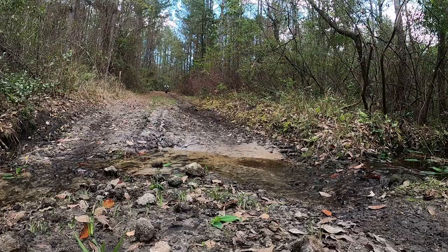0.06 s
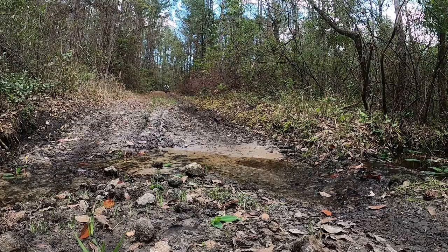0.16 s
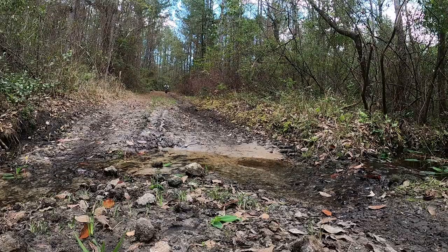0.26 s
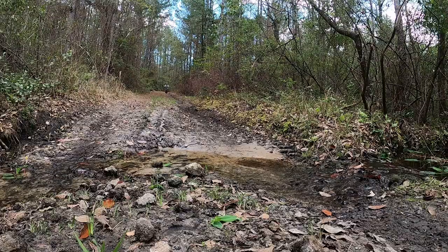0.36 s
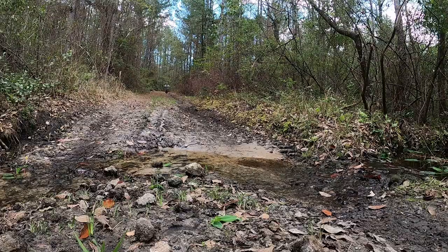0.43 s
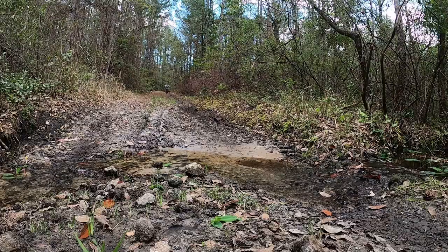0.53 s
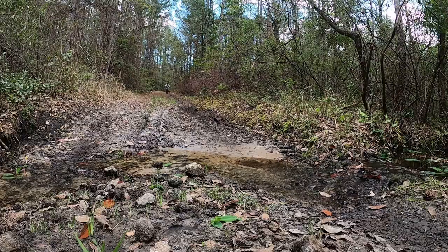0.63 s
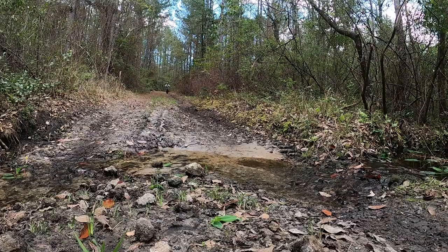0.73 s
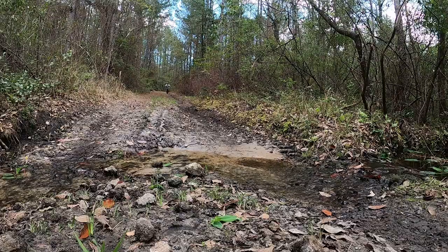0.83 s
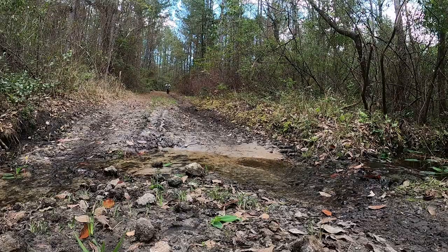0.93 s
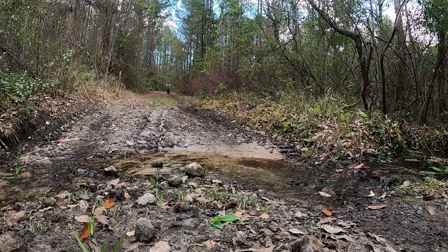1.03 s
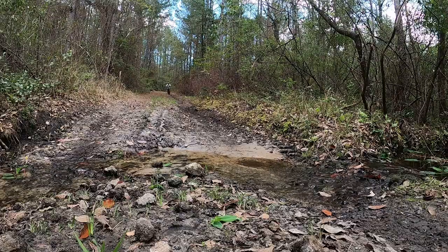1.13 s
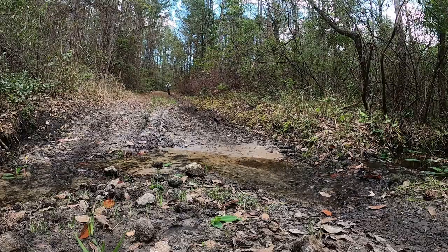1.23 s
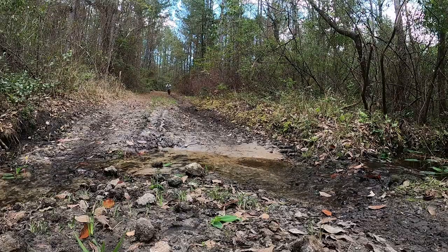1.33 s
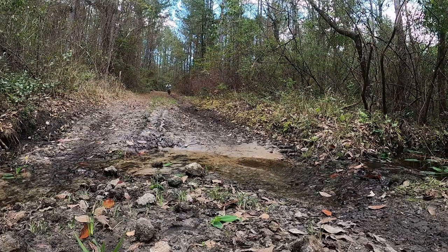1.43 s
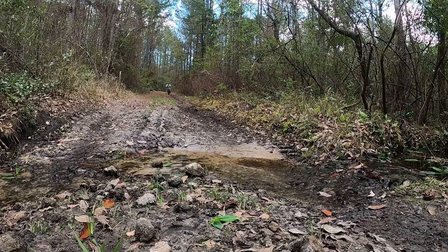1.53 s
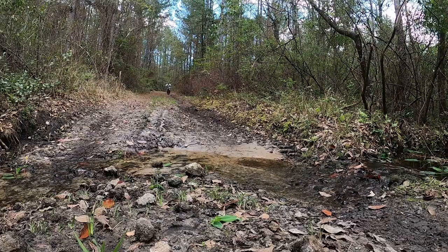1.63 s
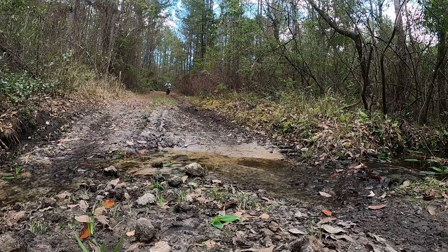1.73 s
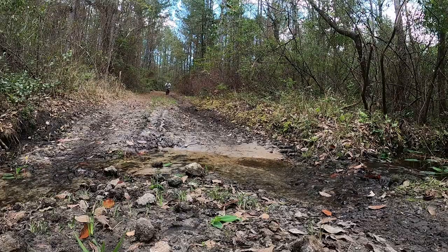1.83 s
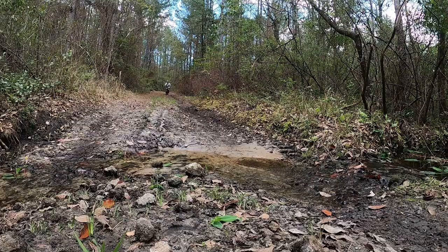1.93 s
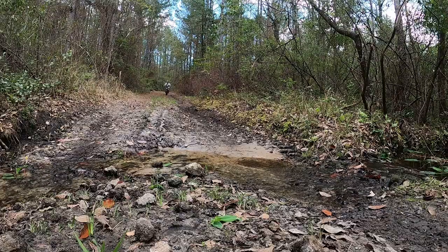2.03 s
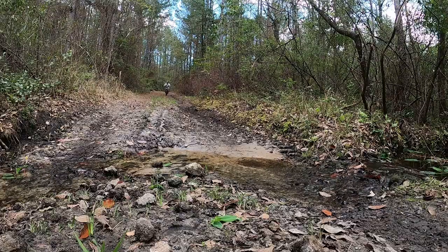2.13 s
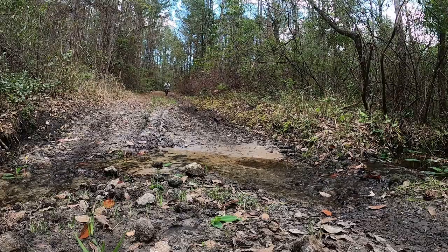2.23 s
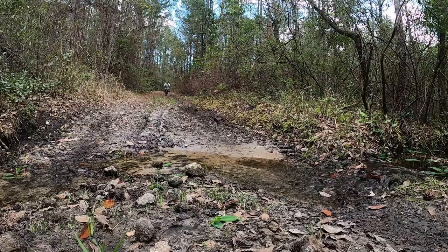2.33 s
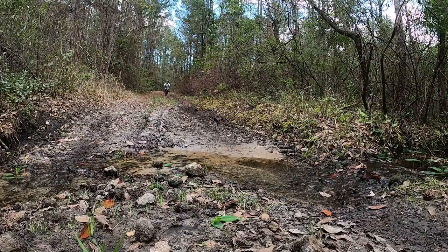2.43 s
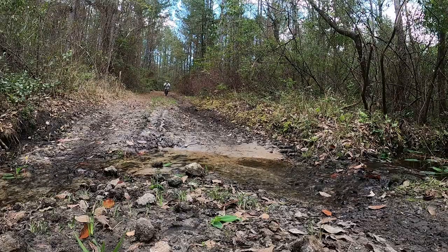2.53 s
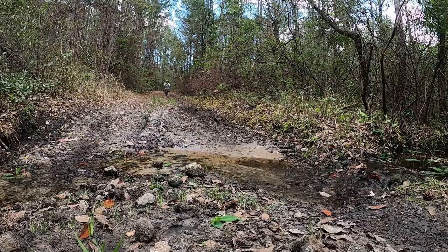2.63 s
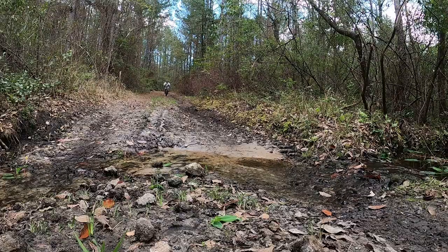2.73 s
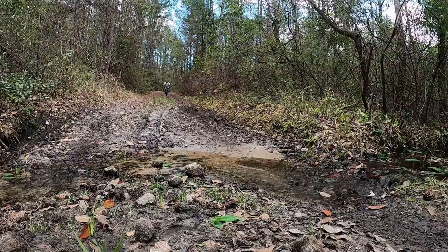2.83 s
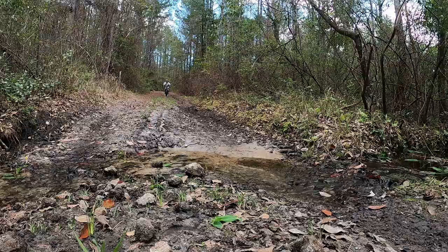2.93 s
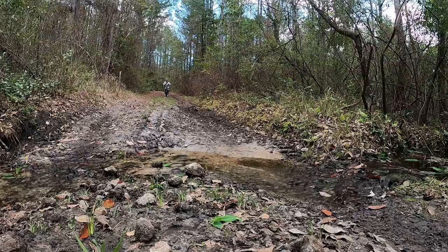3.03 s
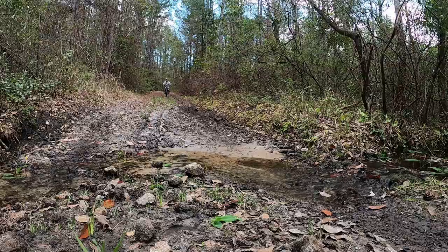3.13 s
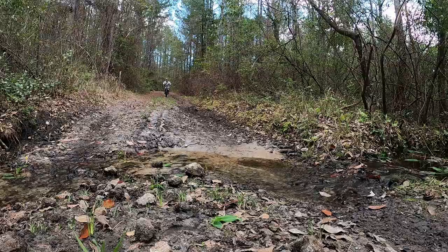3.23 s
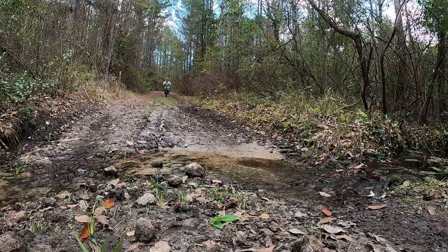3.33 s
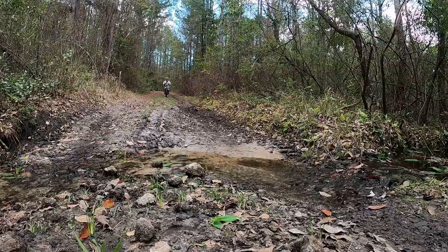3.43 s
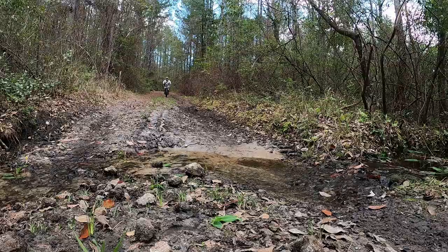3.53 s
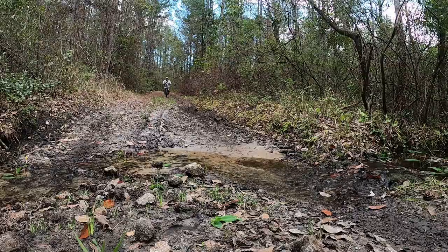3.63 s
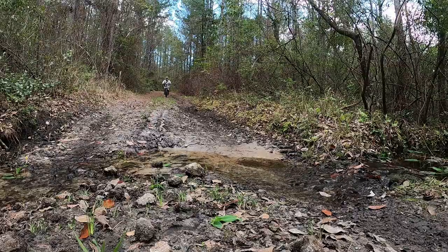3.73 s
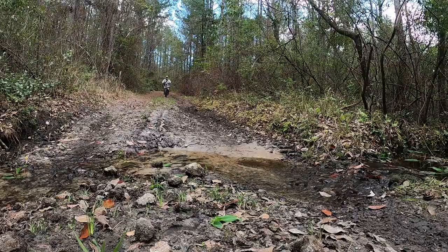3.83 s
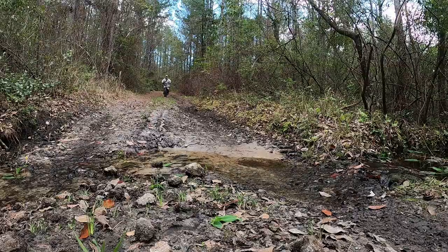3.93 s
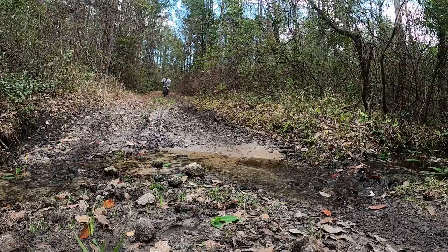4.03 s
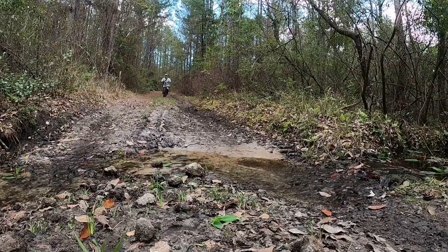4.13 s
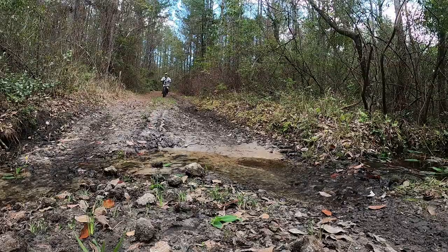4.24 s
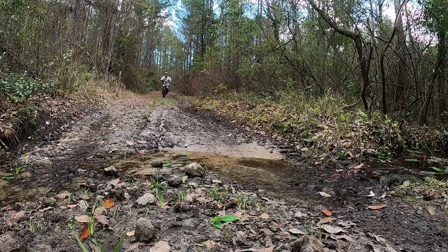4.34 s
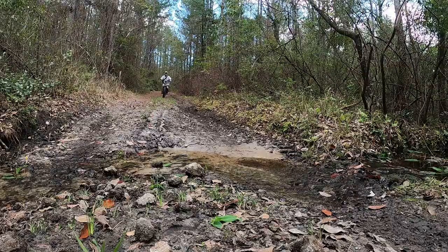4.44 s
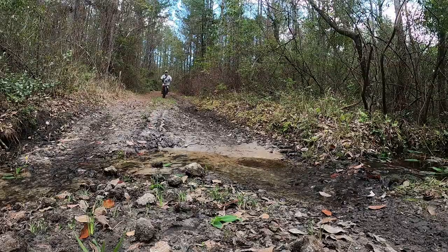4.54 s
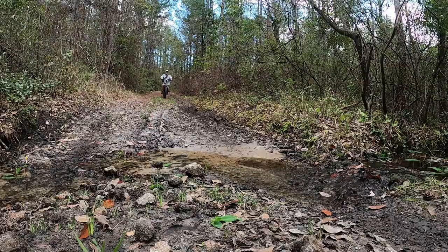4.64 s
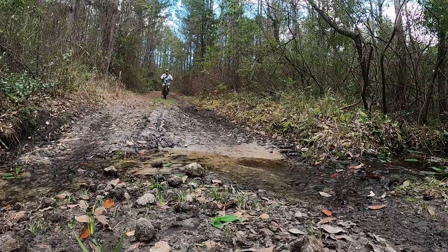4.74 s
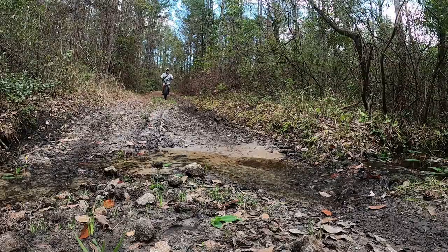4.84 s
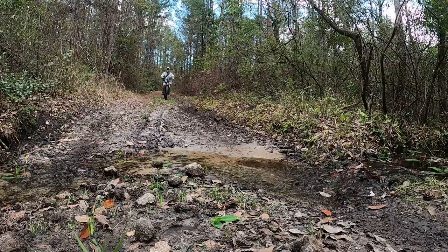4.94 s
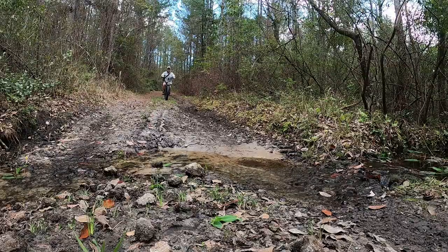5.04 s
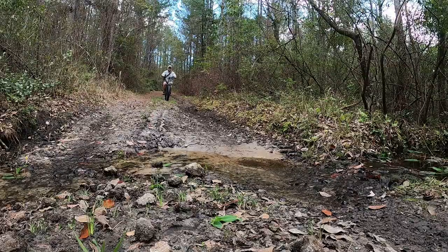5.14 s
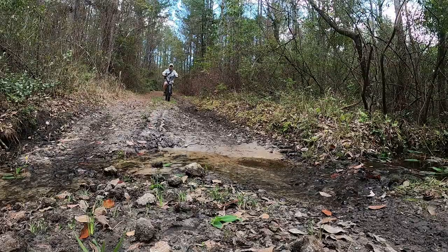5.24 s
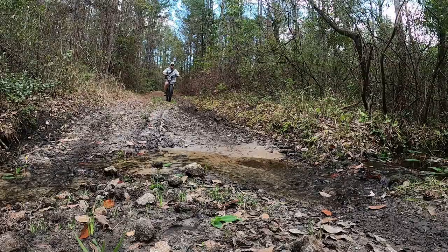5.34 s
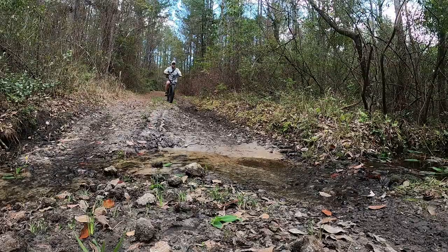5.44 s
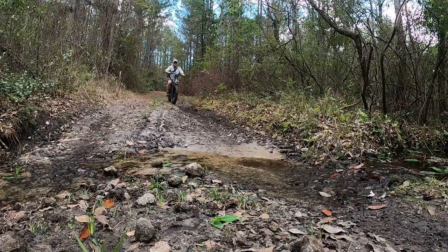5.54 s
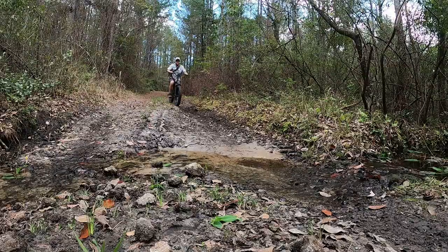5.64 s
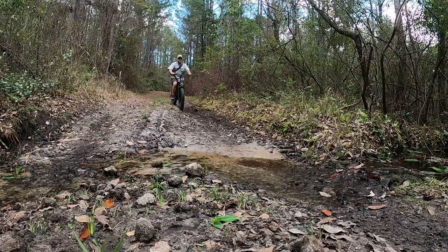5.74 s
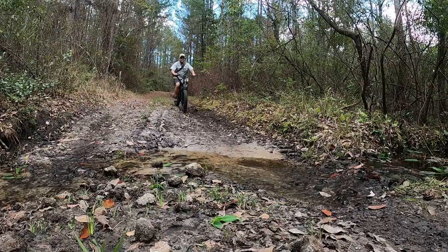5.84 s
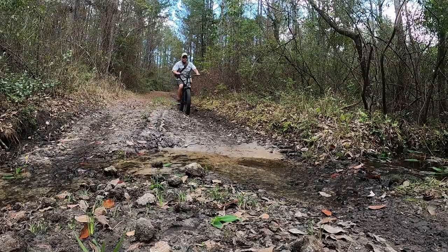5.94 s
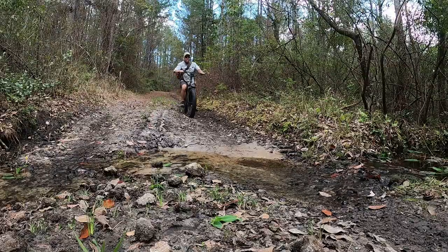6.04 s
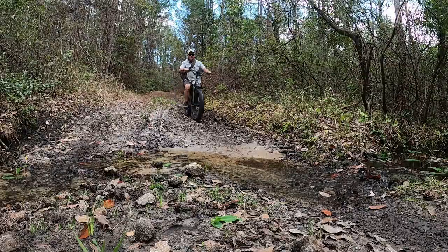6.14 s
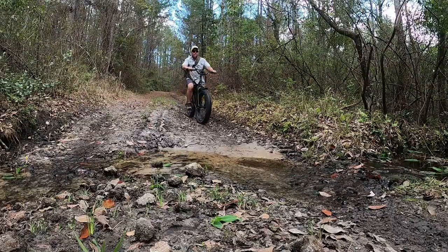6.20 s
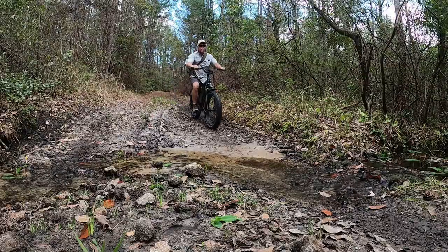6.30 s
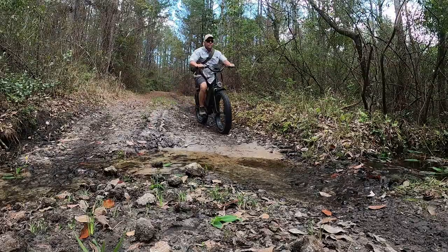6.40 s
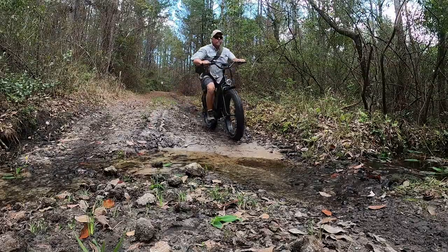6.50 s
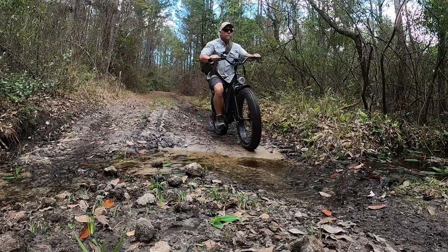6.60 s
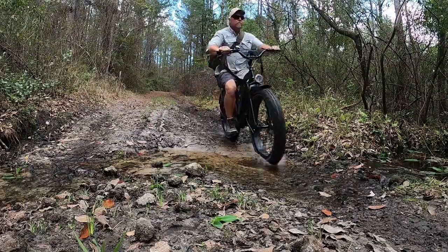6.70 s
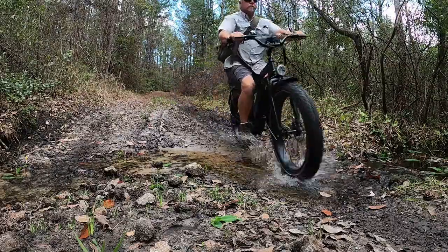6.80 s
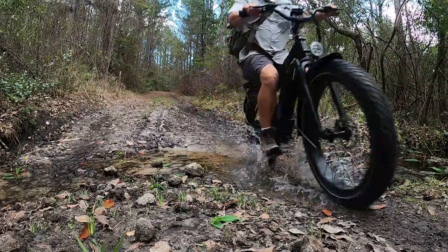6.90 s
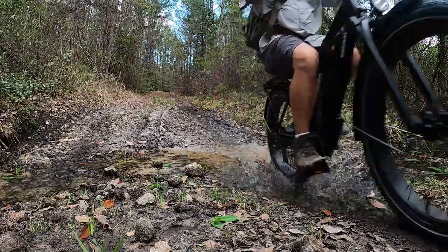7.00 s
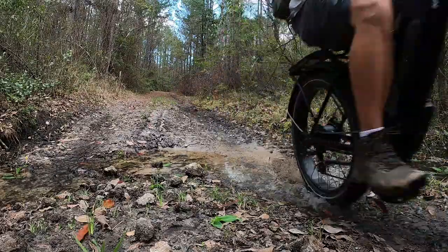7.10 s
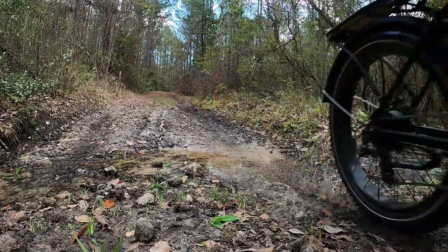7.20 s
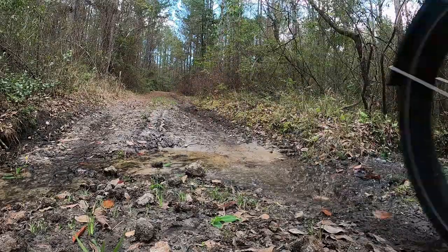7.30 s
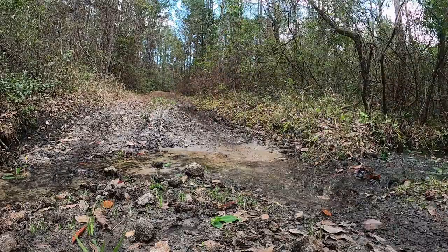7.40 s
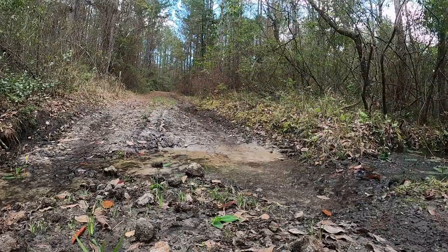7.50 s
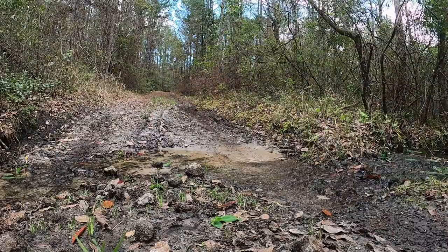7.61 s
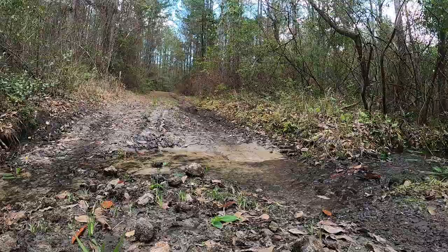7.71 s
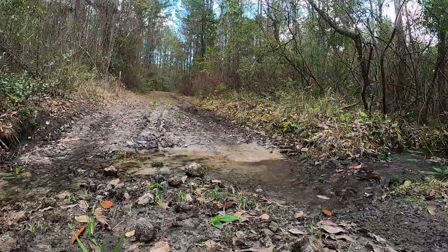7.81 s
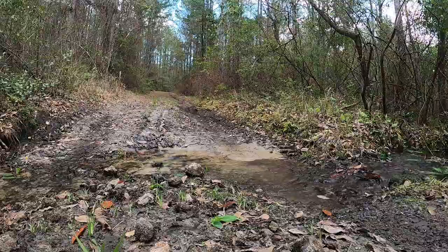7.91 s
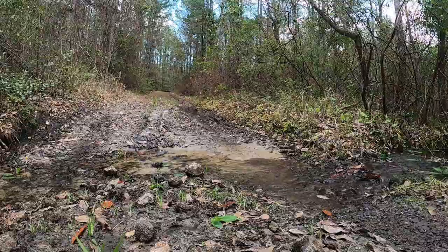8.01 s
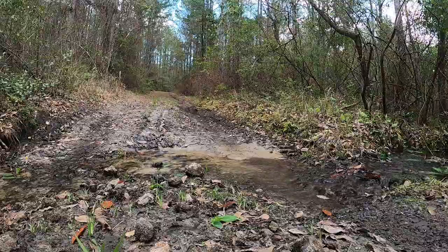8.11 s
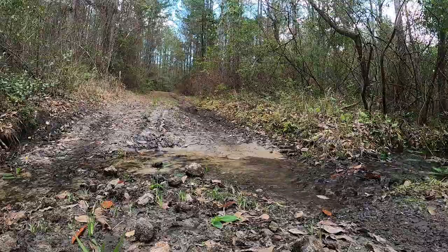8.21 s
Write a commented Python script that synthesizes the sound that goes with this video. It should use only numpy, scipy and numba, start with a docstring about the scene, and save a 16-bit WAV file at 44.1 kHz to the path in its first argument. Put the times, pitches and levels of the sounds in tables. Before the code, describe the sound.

Water trickles and bubbles on a forest trail as a fat-tire electric bike approaches, splashes through a muddy puddle and rolls past.

```python
"""A wet forest trail, heard from the ground. A fat-tyre electric bike comes up, ploughs through a shallow
puddle and rolls past: the tyres crunch grit, thud over stones, squelch in the mud and throw spray.
Close by, water trickles with bright ticks, its bubbles ringing as they pop. Behind it all the
far tyres drone and the woods hiss. Hits are damped sines; textures are clouds of them mixed with noise."""
import sys
import numpy as np
from scipy import signal
from scipy.fft import rfft, irfft, next_fast_len
from scipy.io import wavfile
from scipy.ndimage import uniform_filter1d
from numba import njit

SR = 44100
rng = np.random.default_rng(int(sys.argv[2]) if len(sys.argv) > 2 else 0)


def inscribe(sig):
    """Save sig as 16-bit PCM at rate SR to the path in sys.argv[1].

    A 1-D sig is mono; a 2-D sig holds one channel per row.
    Samples are clipped to [-1, 1] before scaling.
    """
    pcm = np.round(np.clip(np.atleast_2d(sig).T, -1, 1) * 32767)
    wavfile.write(sys.argv[1], SR, pcm.astype(np.int16))


N = 364266

# Near-tyre faders: (time [s], weight [dB], thrown water [dB], mud depth [dB], water fineness [dB])
TYRE_FADERS = [(5.1, -30, -57, 0, -12), (5.55, -69, -63.5, -9, -14), (5.62, -42.5, -67, -2, -2),
               (5.9, -61, -63, 8, -4), (5.92, -31.5, -57, 6, 5), (6.02, -43, -50, 6.5, -4),
               (6.16, -32, -47, 4, 3), (6.3, -28, -47, -2.5, 6), (6.39, -38.5, -46, 1, 16),
               (6.56, -33, -38, 3.5, 14), (6.82, -27, -32.5, -1, 14.5), (6.85, -25, -23, 2, 14.5),
               (6.95, -24, -20.5, 0.5, 8), (7.08, -22, -21, 1, 4.5), (7.27, -21.5, -22.5, 3, -5),
               (7.31, -30.5, -35, 3.5, -6), (7.42, -30.5, -31, -1.5, -2), (7.56, -29, -38, 4.5, 2),
               (7.82, -38, -44.5, 3.5, -18), (7.91, -41, -45, 3, -7), (8.05, -32, -49, 3, 3),
               (8.26, -46.5, -47.5, 6.5, -5)]
# Spurts and jolts: (time [s], level [dB], hold [s], brightness step from layer to layer [dB])
SPURTS = [(5.91, -42, 0.0084, 6), (5.938, -38.5, 0.026, -2.5), (5.983, -48, 0.009, 7.5),
          (6.146, -40, 0.018, -12.5), (6.251, -40, 0.037, -16), (6.317, -43, 0.0062, -14),
          (6.476, -31.5, 0.021, -2.5), (6.59, -32, 0.042, -1), (6.67, -27, 0.038, 0.5),
          (6.754, -34, 0.0089, 6.5), (6.833, -28.5, 0.047, 9.5), (6.978, -29, 0.0099, 1),
          (7.043, -22, 0.0064, 0.5), (7.079, -17.5, 0.032, -1), (7.192, -23, 0.028, -0.5),
          (7.259, -29, 0.0082, -5), (7.364, -35, 0.031, 2.5), (7.402, -44, 0.024, 5),
          (7.455, -30, 0.045, -7), (7.584, -38, 0.012, -8), (7.641, -35, 0.0095, 0),
          (7.688, -43.5, 0.016, 7.5), (7.77, -43.5, 0.061, 0), (7.84, -33.5, 0.011, -5),
          (7.96, -29, 0.033, -4), (8.036, -35, 0.044, -1.5), (8.11, -50, 0.0053, 8),
          (8.138, -33, 0.0069, -2)]
# Spurt trim per layer: (thud [dB], squelch [dB], splash [dB], spray [dB])
SPURT_TRIMS = [-8, -2, -3.5, -9]
# Grit fader: (time [s], level [dB])
GRIT_FADER = [(4.6, -66.5), (5.05, -61.5), (5.3, -58), (5.5, -60), (5.65, -50), (5.88, -49.5), (6.0, -45.5),
              (6.15, -38), (6.3, -48), (6.5, -51), (6.8, -62)]
# Bike pan: (time [s], left minus right [dB])
BIKE_PAN = [(5.3, 0.5), (6.22, 0.5), (6.5, 0), (7.31, -1.5), (7.62, 1.5), (7.81, 5.5), (8.26, 7)]
# Hits on stones (the first row a far thud up the trail), tyre booms, bubble pops, water ticks: (time [s], level
# [dB], pitch [Hz])
STONE_HITS = [(0.312, -37, 334), (5.911, -25.5, 5450), (5.912, -21, 924), (5.953, -21.5, 830),
              (6.065, -17, 1140), (6.175, -17.5, 463), (6.251, -17, 364), (6.256, -17.5, 885),
              (6.265, -19, 335), (6.278, -13.5, 342), (6.331, -22, 340), (6.333, -18.5, 1060),
              (6.482, -16, 3830), (6.517, -13.5, 1140), (6.523, -15.5, 374), (6.591, -23, 3660),
              (6.687, -7.5, 3340), (6.708, -14, 4030), (6.726, -17, 1100), (6.758, -18, 301),
              (6.834, -12, 3600), (6.998, -6.5, 1390), (7.045, -7, 1500), (7.107, -8, 316),
              (7.113, -8, 1090), (7.178, -11, 1280), (7.215, -9, 2510), (7.265, -17, 4230),
              (7.303, -14, 1310), (7.307, -7, 1500), (7.314, -15, 1100), (7.39, -18, 3500),
              (7.462, -13, 480), (7.49, -16, 3340), (7.493, -17, 344), (7.51, -22, 1200), (7.6, -18, 910),
              (7.635, -19, 3230), (7.771, -21, 960), (7.848, -22, 1100), (7.941, -17, 850),
              (7.964, -12, 960), (7.978, -8.5, 1070), (7.992, -17, 1030), (8.029, -12, 298),
              (8.045, -11.5, 347), (8.053, -9, 500), (8.067, -13.5, 430), (8.144, -18.5, 1010)]
TYRE_BOOMS = [(6.72, -26, 55), (7.08, -18, 109), (7.25, -19, 55), (8.111, -26.5, 62)]
BUBBLE_POPS = [(0.079, -40, 2660), (0.164, -33.5, 4930), (0.29, -43.5, 1100), (0.314, -45.5, 870),
               (0.423, -37, 5550), (0.464, -40.5, 3170), (0.558, -36, 5000), (0.656, -43, 2590),
               (0.669, -33, 1476), (0.705, -41, 1554), (0.724, -30.5, 3900), (0.733, -43, 1420),
               (0.753, -46, 1370), (0.817, -45, 4030), (0.833, -51, 2080), (0.942, -47, 720),
               (0.978, -45, 1890), (1.064, -36, 1436), (1.066, -40, 1880), (1.154, -37.5, 1970),
               (1.199, -35.5, 4220), (1.223, -37, 3360), (1.268, -37.5, 3040), (1.395, -46.5, 1310),
               (1.562, -43.5, 1440), (1.587, -40, 2840), (1.61, -31, 1965), (1.668, -40, 1750),
               (1.781, -40, 3080), (1.794, -44, 1380), (1.794, -40, 2460), (1.824, -38.5, 2750),
               (1.862, -40, 4290), (1.952, -44, 1310), (1.994, -40, 1330), (2.085, -34.5, 3160),
               (2.129, -33, 3180), (2.146, -36.5, 2710), (2.165, -36, 3150), (2.198, -47, 2450),
               (2.222, -29, 4900), (2.229, -47, 1360), (2.235, -27.5, 4250), (2.305, -47, 1900),
               (2.39, -45, 1430), (2.655, -40.5, 1700), (2.774, -34, 6000), (2.95, -43.5, 3100),
               (2.968, -45, 1650), (3.006, -38.5, 3630), (3.02, -37, 1920), (3.076, -41, 2000),
               (3.086, -32.5, 1760), (3.134, -40, 2450), (3.137, -41.5, 1620), (3.25, -42, 752),
               (3.267, -41, 3380), (3.302, -32.5, 3170), (3.456, -39, 5200), (3.48, -37, 5400),
               (3.552, -34, 2600), (3.669, -42.5, 1760), (3.996, -38, 2440), (4.026, -38, 2450),
               (4.279, -41, 1970), (4.332, -36.5, 5800), (4.383, -43, 1035), (4.476, -39.5, 3360),
               (4.502, -36, 4800), (4.525, -34, 1014), (4.827, -33, 1550), (4.889, -33, 1750),
               (5.016, -42, 2850), (5.05, -39.5, 1720), (5.217, -38, 1310), (5.287, -44, 1880),
               (5.341, -28.5, 4900), (5.468, -42, 1870), (5.492, -40.5, 1360), (5.551, -32.5, 2450),
               (5.633, -43, 990), (5.651, -40, 950), (5.669, -34, 1850), (5.748, -40, 2040),
               (5.806, -37, 1025)]
WATER_TICKS = [(0.2144, -42, 3040), (0.626, -42.5, 4780), (0.707, -40, 2550), (0.771, -42, 2420),
               (0.8579, -48, 4810), (0.9782, -39, 3330), (1.0066, -42, 3210), (1.0234, -43, 2790),
               (1.062, -44, 3770), (1.0783, -38, 2600), (1.1483, -39, 2510), (1.1644, -40, 5400),
               (1.409, -36, 4700), (1.4204, -41, 3270), (1.6377, -34, 5380), (1.947, -32, 4890),
               (2.3323, -37, 7250), (2.4354, -44, 3940), (2.4638, -42, 4390), (2.5664, -44, 2700),
               (2.945, -41, 3060), (3.0375, -42, 2540), (3.1504, -39, 2800), (3.165, -39, 4050),
               (3.279, -37, 4000), (3.3456, -36, 7030), (3.3633, -42, 4760), (3.473, -41, 5470),
               (3.518, -44, 2790), (4.1046, -39.5, 2880), (4.579, -39, 3770), (4.8858, -43, 5360),
               (4.927, -36, 4350), (5.2859, -38, 2680), (5.471, -36, 3650), (5.7415, -37, 2570),
               (5.7872, -37, 2720), (0.8744, -44, 6650), (0.9582, -41, 6090), (3.0204, -41, 4890),
               (3.0375, -39, 5400), (3.1314, -34.5, 3600), (5.009, -37, 5200), (4.756, -41, 3150),
               (3.56, -40, 4770), (5.7498, -30, 7740)]
# Tone of each texture: (frequency [Hz], relative level [dB])
THUD_EQ = [(12, -67), (20, -11), (50, -0.5), (114, 3), (151, 1), (343, -1), (375, -6), (700, -13.5),
           (910, -55), (1540, -120)]
SQUELCH_EQ = [(260, -14.5), (450, 8), (537, -1), (701, 3), (928, 6.5), (1310, 8), (2300, -7.5), (2990, 6),
              (5060, -120)]
SPLASH_EQ = [(1060, -21), (1800, 7.5), (2280, 2), (2470, 4), (3910, 3.5), (5200, -3.5), (6760, -30),
             (11400, -120)]
SPRAY_EQ = [(2820, -16.5), (4800, -2.5), (7930, -12), (8840, -15), (10000, -20), (12200, -20.5),
            (15600, -30)]
GRIT_EQ = [(290, -40), (500, -1), (764, -14), (909, -5.5), (1010, 3), (1530, -11.5), (1840, -6), (2230, -4),
           (2650, -2), (3400, -22), (5000, -23), (6500, -45), (11000, -120)]
DRONE_EQ = [(85, -37), (145, 0), (273, -7), (346, -12.5), (433, -12.5), (606, -27.5), (700, -19),
            (910, -55), (1540, -120)]
WATER_EQ = [(240, -28), (400, 2), (762, -2.5), (865, -4), (1030, -4), (1520, -9), (3500, -13.5),
            (4550, -42), (7700, -120)]
RUMBLE_EQ = [(12, -80), (20, -27), (66, -2), (102, -1), (110, -6), (140, -4), (240, -120)]
LEAF_EQ = [(1650, -6.5), (2800, -6), (4070, -6.5), (5420, -4), (6490, -7), (7650, -5), (8770, -11.5),
           (10900, -21), (12500, -20), (14900, -45), (15600, -62)]
# Distant faders: (time [s], tyre drone [dB], lowest hum [dB], leaf hiss [dB])
FAR_FADERS = [(0, -47.5, -74, -56.5), (.5, -52.5, -61.5, -56.5), (1.5, -50.5, -66, -54),
              (1.75, -50.5, -52, -49.5), (2.1, -51, -49.5, -57), (2.6, -49.5, -50.5, -59),
              (3.3, -48.5, -48.5, -57.5), (3.6, -47, -72, -60), (3.75, -52, -56, -60.5),
              (4.08, -46.5, -57, -57), (4.16, -47.5, -54, -51.5), (4.9, -45.5, -62, -52.5),
              (5.4, -44.5, -63, -53), (5.9, -41.5, -69, -47.5), (8.26, -51, -51, -45)]
# Dull thumps far up the trail: (peak time [s], level [dB])
FAR_THUMPS = [(1.7, -36), (3.91, -39), (4.17, -50)]
# Hums over the drone: (pitch [Hz], width [Hz])
HUM_BANDS = [(135.3, 6.7), (195, 6.8), (238, 10), (270, 23)]
# Upper hum faders: (time [s], second hum [dB], third hum [dB], fourth hum [dB])
HUM_FADERS = [(0, -54.5, -76, -63), (.8, -52.5, -70, -74), (1.2, -60.5, -57.5, -72), (1.6, -67, -60, -74),
              (2.0, -50.5, -56.5, -72), (2.4, -54.5, -60.5, -69), (2.9, -62, -61, -57.5),
              (3.25, -64, -56, -45), (3.4, -63, -63, -66), (3.9, -61, -64, -63), (4.4, -65.5, -66, -76),
              (5.1, -64, -49, -70), (5.9, -67, -59, -70)]
# Insect whine: (pitch [Hz], width [Hz], level [dB])
INSECT_BAND = (7560, 600, -71)
# Stereo balance: (frequency [Hz], left minus right [dB])
STEREO_BALANCE = [(60, 2), (110, 3), (200, 2.5), (380, 1), (700, 0), (1290, 1), (2380, 3), (4400, 3.5),
                  (8120, 2.5), (15000, -2.5)]
# Stereo phase: (frequency [Hz], left lead [rad])
STEREO_PHASE = [(0, -2), (430, 0.21), (4570, -1.46), (5510, -1.4), (5860, -1.4), (6720, -1.5), (7840, -2.5),
                (8700, -1.6), (9650, -1.5), (11400, -2.5), (13100, -2.5), (13700, -1), (14400, -7),
                (15300, -7.5)]

TIME = np.arange(N) / SR
ENTERS_S, ARRIVES_S, PASSES_S = TYRE_FADERS[0][0], 5.9, 7.57


def bike():
    """The pass-by: four tyre layers on their faders, with gurgles, grit and hits, all panned together."""
    weight_db, water_db, mud_db, fine_db = curves(TYRE_FADERS)
    squelch_db = weight_db + 0.42 * (water_db - weight_db) + mud_db - 2.65  # between weight and water
    behind_db = 5.5 * (1 + np.tanh((TIME - PASSES_S) / 1.1)) / 2  # more spray from behind
    spray_db = 0.81 * water_db + 0.19 * fine_db + behind_db - 16
    gains = add_spurts([weight_db, squelch_db, water_db, spray_db])
    layers = thud(), squelch(), splash(fine_db), spray()
    tyres = sum(gain * layer for gain, layer in zip(gains, layers))
    tyres += gurgles(water_gain=np.hypot(gains[1], gains[2]))
    fade_in = np.clip((TIME - ENTERS_S) / 0.3, 0, 1)
    pan_db, = curves(BIKE_PAN)
    return (fade_in * tyres + grit() + stone_knocks() + tyre_booms()) * undb([pan_db / 2, -pan_db / 2])


def add_spurts(faders_db):
    """Gains for the layers, dark to bright, with spurts punched in; longer spurts die more slowly."""
    s, db, hold, bright_db = np.transpose(SPURTS)
    gains = []
    for k, (fader_db, trim_db) in enumerate(zip(faders_db, SPURT_TRIMS)):
        spurt_db = db + trim_db + (k - 1.25) * bright_db
        spurts = swells(s, spurt_db, attack=0.0015, hold=hold, release=0.003 + 0.13 * hold)
        gains.append(np.sqrt(undb(fader_db) ** 2 + spurts))
    return gains


def thud():
    """The weight of the tyres on the trail; the sub-bass blooms while the wheels are close."""
    body = wide(lambda: grains(ENTERS_S, 500, (40.3, 736), THUD_EQ,
                               cycles=4.1, spread_db=1.55, noise=6.2, clump_db=1.8), 0.94)
    closeness = np.exp(-((TIME - 7.5) / 0.52) ** 2)
    return tilt(body, 74, low_db=12 * closeness - 6, high_db=0)


def squelch():
    """Mud squeezed under the tyres: dense midrange bubbles."""
    mud = wide(lambda: grains(ENTERS_S, 1800, (403, 2533), SQUELCH_EQ,
                              cycles=7.9, spread_db=2.1, noise=1.98, clump_db=1), 0.85)
    return mud * undb(slosh_db())


def splash(fine_db):
    """Water thrown from the puddle: the finer, the brighter. Lows and highs slosh separately."""
    water = wide(lambda: grains(ENTERS_S, 2000, (1584, 5470), SPLASH_EQ,
                                cycles=9.2, spread_db=3.6, noise=2.17, clump_db=1.2), 0.95)
    return tilt(water, 3000, low_db=slosh_db() - fine_db / 2, high_db=slosh_db() + fine_db / 2)


def slosh_db():
    """The uneven surge of thrown water."""
    return 1.7 * walk(36)


def spray():
    """Fizz of fine droplets; the mist on top opens up once the bike is heard from behind."""
    fizz = wide(lambda: grains(ENTERS_S, 2200, (4360, 13060), SPRAY_EQ,
                               cycles=14, spread_db=2.2, noise=0.82, clump_db=0.84), 0.62)
    return tilt(fizz, 11200, low_db=0, high_db=8.5 * np.tanh((TIME - PASSES_S) / 0.48))


def gurgles(water_gain, per_s=200):
    """Larger bubbles ring clearly and glide up, riding the level of the water."""
    span = N / SR - ENTERS_S
    when, pitch, softness, length = rng.random((int(span * per_s), 4)).T
    s, hz = ENTERS_S + when * span, 600 * 6.52 ** pitch
    db = 20 * np.log10(water_gain[(s * SR).astype(int)]) + 3 - 12 * softness
    return ring(s, db, hz, t60=45 * (0.5 + length) / hz, glide=0.037, rise=6.4)


def grit():
    """Grit crunching under the tread as the bike draws near."""
    level_db, = curves(GRIT_FADER)
    return undb(level_db) * grains(GRIT_FADER[0][0], 2000, (700, 3570), GRIT_EQ,
                                   cycles=7.3, spread_db=3.2, noise=0.87, clump_db=1.6)


def stone_knocks():
    """Stones and clods knocked by the tyres clatter, without deep bass; low ones ring a little longer. The
    first hit, at 0.31 s, is a dull thud far up the trail, long before the bike comes."""
    s, db, hz = np.transpose(STONE_HITS)
    t60 = 0.017 + 4.7 / hz
    knocks = ring(s, db, hz, t60, rise=1.4)
    clatter = cluster(s, db - 12, 1.98 * hz, t60 / 3, count=6, spread_s=0.006, octaves=2.12, drop_db=12)
    return tilt(knocks + clatter, 196, low_db=-25, high_db=0)


def tyre_booms():
    """The fat tyres boom on bumps: low notes that bend upwards."""
    return ring(*np.transpose(TYRE_BOOMS), t60=0.26, glide=0.11, rise=4)


def trickle():
    """Bubbles pop close by: each a tick, a note and a bright snap, trailed by droplets and faint pops."""
    s, db, hz = np.transpose(BUBBLE_POPS)
    t60 = 77 / hz * (2000 / np.maximum(hz, 2000)) ** 0.41  # high bubbles ring for fewer cycles
    pan_db = 1.2 * rng.standard_normal(len(s))
    sides = []
    for side_db in (db + pan_db / 2, db - pan_db / 2):
        tick = ring(s, side_db - 11, 1.6 * hz, t60=12 / hz, rise=11)
        note = ring(s, side_db, hz, t60, glide=0.015, rise=2.4)
        snap = ring(s, side_db - 6.5, hz=4540, t60=0.0053, rise=3.4)
        sides.append(tick + note + snap)
    droplets = cluster(s + 0.004, db - 9, hz, t60 * 1.5, count=2, spread_s=0.02, octaves=0.25, drop_db=9)
    splatter = cluster(s, db - 7, hz, t60 / 3, count=3, spread_s=0.012, octaves=1.3, drop_db=8)
    return np.array(sides) + droplets + splatter + faint_pops(s)


def faint_pops(pop_s, per_s=70):
    """Quiet bubbles scattered just after the main pops."""
    parent, pitch, size, delay = rng.random((int(N / SR * per_s), 4)).T
    s = pop_s[(parent * len(pop_s)).astype(int)] + 0.12 * delay
    db = np.minimum(-56 - 2.2 * np.log(1 - size), -44)
    hz = 1100 * 5.54 ** pitch
    return ring(s, db, hz, t60=30 / hz, glide=0.031, rise=2.1)


def water_ticks():
    """Short, bright ticks and snaps of the trickling water."""
    s, db, hz = np.transpose(WATER_TICKS)
    snaps = cluster(s, db - 6, hz, 18 / hz, count=3, spread_s=0.005, octaves=0.5, drop_db=0)
    return ring(s, db, hz, t60=44 / hz, rise=2.6) + snaps


def background():
    """The distant bed; water and rumble build until the bike arrives, thumps swell drone and water."""
    drone_db, hum_db, leaf_db = curves(FAR_FADERS)
    approach_s = np.minimum(TIME, ARRIVES_S)
    s, db = np.transpose(FAR_THUMPS)
    thumps = swells(s - 0.074, db, attack=0.074, hold=0, release=0.026)
    water_db = -57 + 0.4 * (drone_db - FAR_FADERS[0][1]) + 0.79 * approach_s  # partly rides the drone
    water_gain = np.sqrt(undb(water_db) ** 2 + undb(-14) ** 2 * thumps)
    drone_gain = np.sqrt(undb(drone_db) ** 2 + thumps)
    return (undb(-68 + 2 * approach_s) * rumble() + insects() + water_gain * running_water()
            + undb(leaf_db) * leaf_hiss() + hums(hum_db) + drone_gain * tyre_drone())


def tyre_drone():
    """Tyres rolling far off: low, gently wavering noise."""
    return wide(lambda: wavering_noise(DRONE_EQ, flicker_db=0.98), 0.79)


def hums(lowest_db):
    """Four faint low tones over the drone, each on its own fader."""
    faders = [lowest_db] + curves(HUM_FADERS)
    return sum(undb(db) * wide(lambda: narrow(*band), 0.83) for db, band in zip(faders, HUM_BANDS))


def running_water():
    """Small bubbles blur into a murmur."""
    return wide(lambda: grains(0, 300, (509, 3880), WATER_EQ,
                               cycles=14.8, spread_db=2.3, noise=2.23, clump_db=0.88), 0.64)


def leaf_hiss():
    """An airy, grainy hiss of leaves."""
    return wide(lambda: grains(0, 170, (2940, 10340), LEAF_EQ,
                               cycles=28, spread_db=6.8, noise=3.26, clump_db=0.63), 0.47)


def rumble():
    """A deep, unsteady floor under the scene."""
    return wide(lambda: wavering_noise(RUMBLE_EQ, flicker_db=3), 0.8)


def insects():
    """A thin, high band that sways in level."""
    hz, width, db = INSECT_BAND
    return undb(db + 1.5 * walk(3)) * wide(lambda: narrow(hz, width), 0)


def grains(start_s, per_s, band_hz, eq, cycles, spread_db, noise, clump_db):
    """A cloud of random rings over smooth noise, shaped by an EQ and clumped in level; rms 1."""
    low, high = band_hz
    span = N / SR - start_s
    when, pitch, size, length = rng.random((int(span * 2500), 4))[:int(per_s * span)].T
    hz = low * (high / low) ** pitch
    turns = cycles * 4 ** length
    db = spread_db * np.minimum(-np.log(1 - size), 4.3)
    db += 20 * np.log10(hz / high) - 10 * np.log10(turns)  # lift high and short rings so they carry
    cloud = ring(start_s + when * span, db, hz, turns / hz, glide=0.039)
    cloud /= np.std(cloud[int(start_s * SR):])
    texture = colour(cloud + noise * rng.standard_normal(N), eq)
    return unit(texture * undb(clump_db * walk(70)))


def cluster(s, db, hz, t60, count, spread_s, octaves, drop_db):
    """Rings scattered in pitch that trail each hit."""
    late, pitch, softness = rng.random((len(s), count, 3)).T.reshape(3, -1)
    s, db, hz, t60 = (np.tile(v, count) for v in (s, db, hz, t60))
    hz = np.minimum(hz * 2 ** (octaves * (pitch - 0.3)), 12000)
    return ring(s + spread_s * late ** 2, db - drop_db * (softness + late), hz, t60, glide=0.011)


def ring(s, db, hz, t60, glide=0.0, rise=6.0):
    """Hits that fade in over `rise` radians and die in t60 seconds, gliding up if asked."""
    hz, t60 = np.full(len(s), hz), np.full(len(s), t60)
    decay = np.clip(np.log(1000) / (t60 * SR), 1e-4, 0.5)
    return damped_sines(s * SR, 2 * np.pi * hz / SR, decay, undb(db), float(glide), float(rise))


@njit
def damped_sines(starts, steps, decays, sizes, glide, rise):
    """Sum the rings sample by sample."""
    out = np.zeros(N)
    for start, step, decay, size in zip(starts, steps, decays, sizes):
        phase = 0.0
        for i in range(int(start), min(int(start) + int(5 / decay), N)):
            out[i] += size * min(phase / rise, 1.0) * np.sin(phase)
            phase += step
            step *= 1 + glide * decay
            size *= 1 - decay
    return out


def swells(s, db, attack, hold, release):
    """Summed power of attack-hold-release envelopes; times in seconds."""
    t = np.arange(SR) / SR
    power = np.zeros(N + SR)
    for at, peak, stay, fall in np.broadcast(s, undb(db) ** 2, hold, release):
        i = int(at * SR)
        tail = np.exp(-np.maximum(t - attack - stay, 0) / fall)
        power[i:i + SR] += peak * np.minimum(t / attack, 1) ** 2 * tail
    return power[:N]


def wavering_noise(eq, flicker_db):
    """Coloured noise whose level flickers."""
    return colour(rng.standard_normal(N), eq) * undb(flicker_db * walk(11))


def narrow(hz, width):
    """Noise in a narrow band."""
    band = signal.butter(1, [hz - width / 2, hz + width / 2], "band", fs=SR, output="sos")
    return unit(signal.sosfilt(band, signal.sosfilt(band, rng.standard_normal(N))))


def walk(rate):
    """Random levels held 1 / rate s and smoothed twice; spread near 1."""
    hold = int(SR / rate)
    steps = np.repeat(rng.standard_normal(N // hold + 1), hold)
    return 1.3 * uniform_filter1d(uniform_filter1d(steps, hold), hold)[:N]


def wide(make, shared):
    """Stereo with a share of its power common to both sides."""
    return np.sqrt(shared) * make() + np.sqrt(1 - shared) * np.array([make(), make()])


def tilt(x, hz, low_db, high_db):
    """Separate gains below and above a crossover."""
    low, high = (signal.sosfilt(signal.butter(2, hz, kind, fs=SR, output="sos"), x)
                 for kind in ("low", "high"))
    return undb(low_db) * low - undb(high_db) * high


def colour(x, eq, size=4096):
    """Minimum-phase EQ from the folded cepstrum; rms 1."""
    cepstrum = irfft(np.log(undb(on_hz(eq, size))))
    cepstrum[1:size // 2] *= 2
    cepstrum[size // 2 + 1:] = 0
    impulse = irfft(np.exp(rfft(cepstrum)))
    return unit(signal.fftconvolve(x, impulse)[:N])


def on_hz(table, size):
    """A frequency table read at FFT bins, on a log axis."""
    hz, value = np.transpose(table)
    return np.interp(np.log(np.arange(size // 2 + 1) * SR / size + 1), np.log(hz + 1), value)


def curves(table):
    """Fader moves: each column joined by straight lines in time."""
    s, *columns = np.transpose(table)
    return [np.interp(TIME, s, column) for column in columns]


def undb(db):
    return 10 ** (np.asarray(db) / 20)


def unit(x):
    return x / np.sqrt(np.mean(x ** 2))


def scene():
    """The bed, the close water and the passing bike, in stereo."""
    return background() + trickle() + water_ticks() + bike()


def record(dry):
    """Offset the two sides in level and phase, round off loud peaks and cut the top."""
    size = next_fast_len(N + SR // 10)
    size += size % 2
    offset = (np.log(undb(on_hz(STEREO_BALANCE, size))) + 1j * on_hz(STEREO_PHASE, size)) / 2
    sides = irfft(rfft(dry, size) * np.exp([offset, -offset]), size)[:, :N]
    top_cut = signal.ellip(12, 0.2, 100, 15725, fs=SR, output="sos")
    return signal.sosfilt(top_cut, np.tanh(0.8 * sides) / 0.8)


dry = scene()
out = record(dry)
inscribe(out)
```